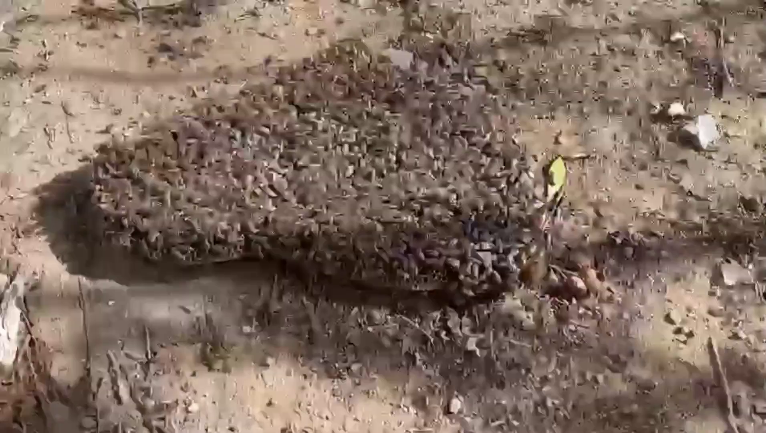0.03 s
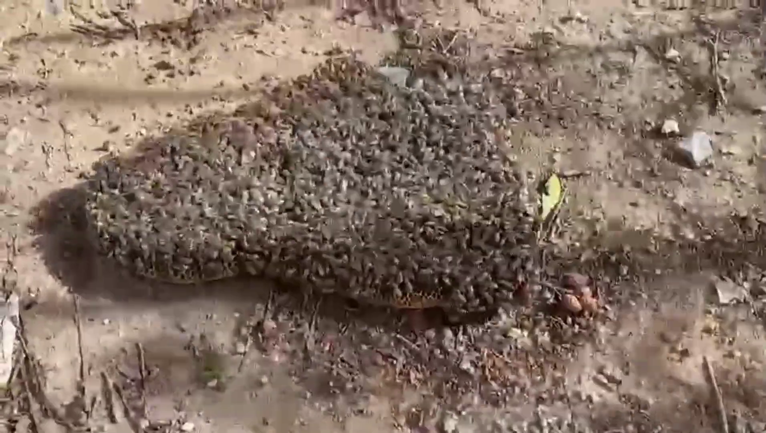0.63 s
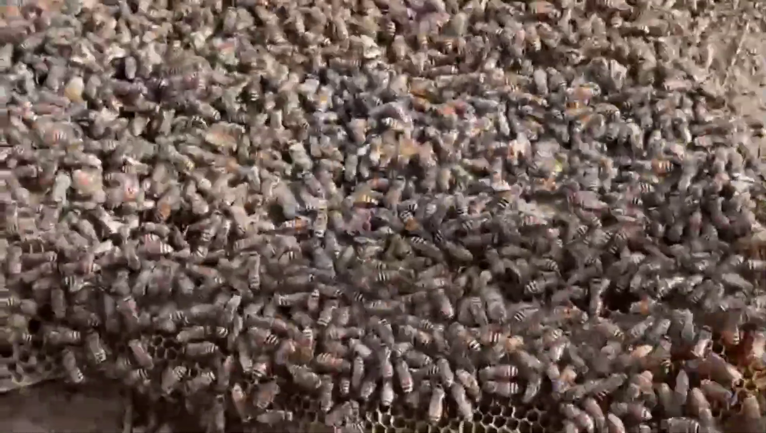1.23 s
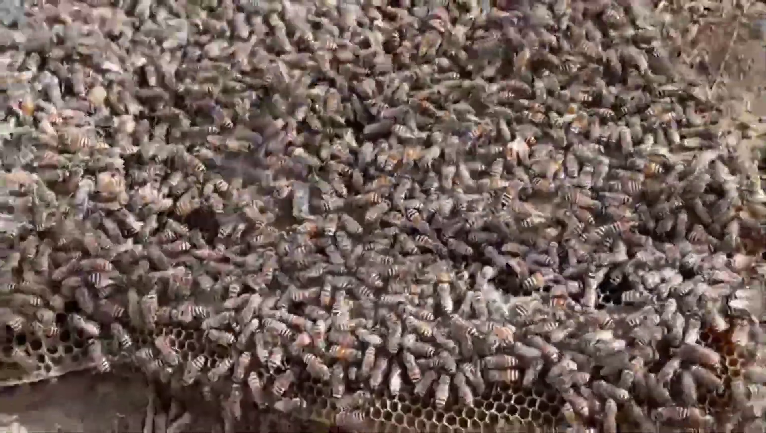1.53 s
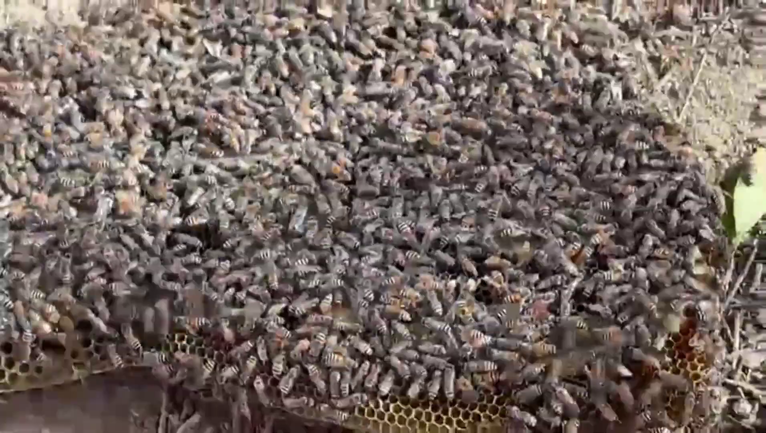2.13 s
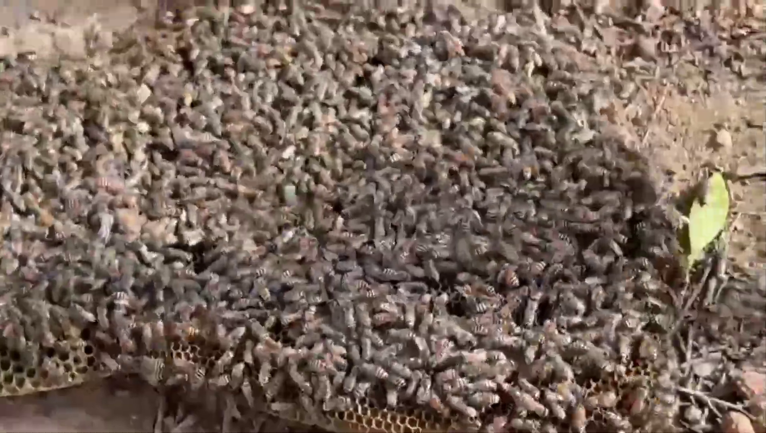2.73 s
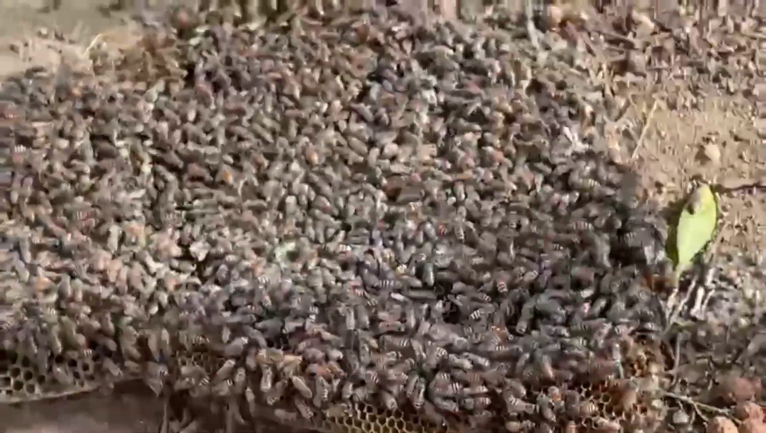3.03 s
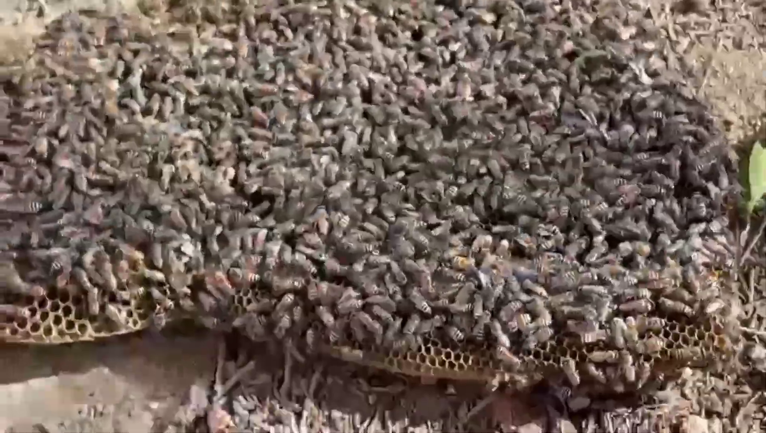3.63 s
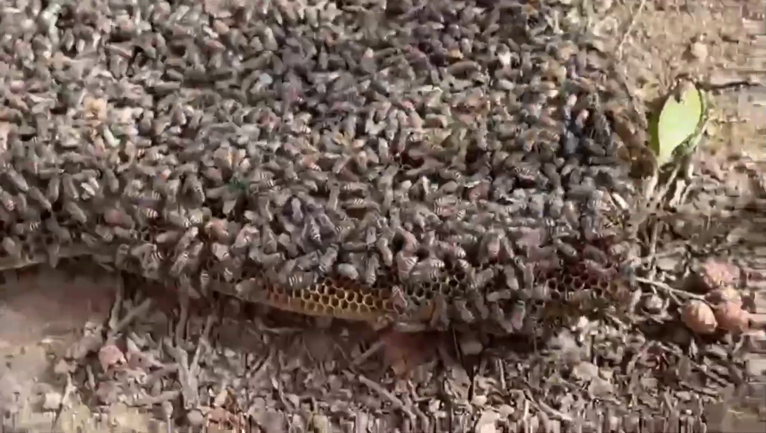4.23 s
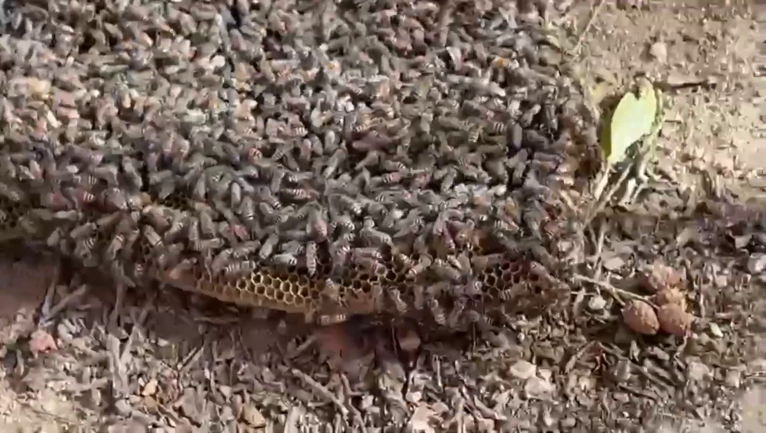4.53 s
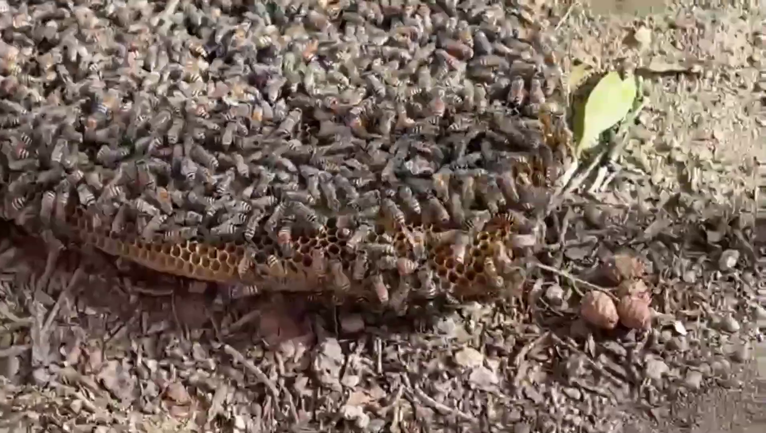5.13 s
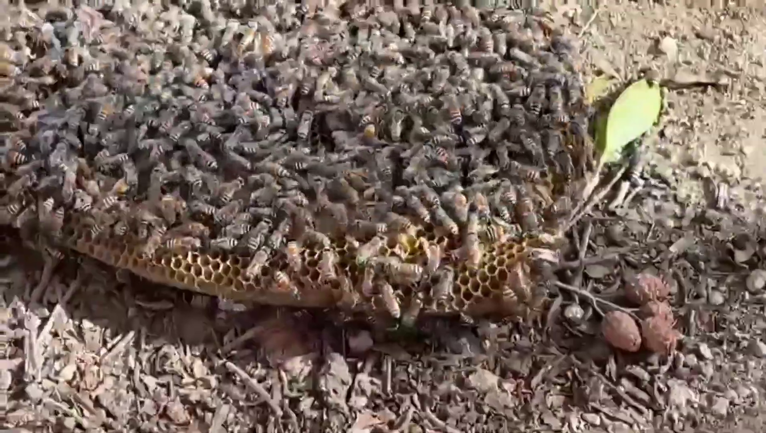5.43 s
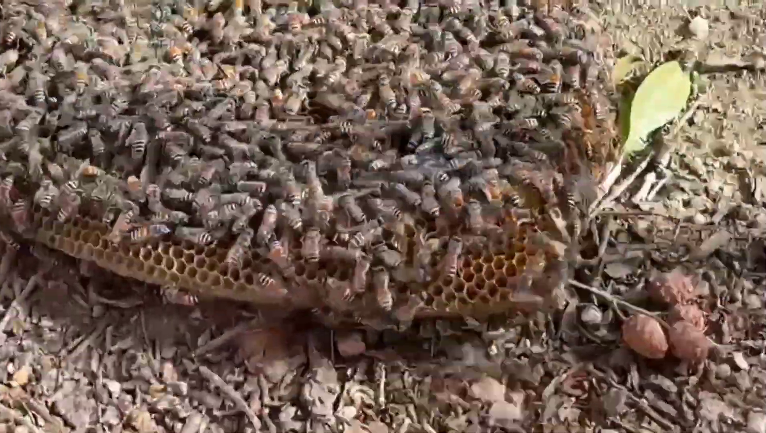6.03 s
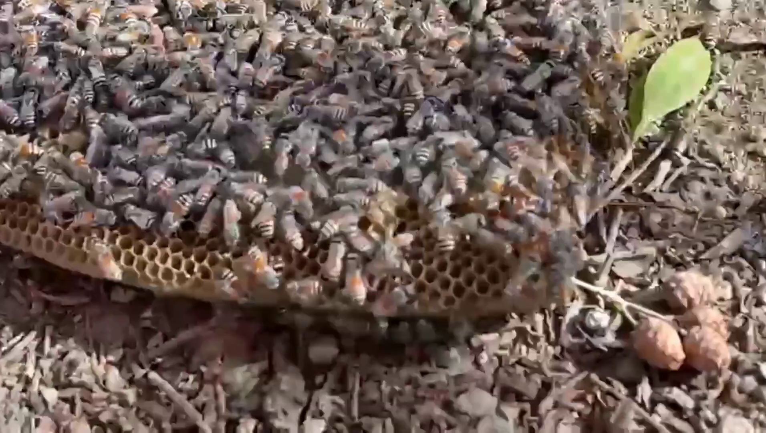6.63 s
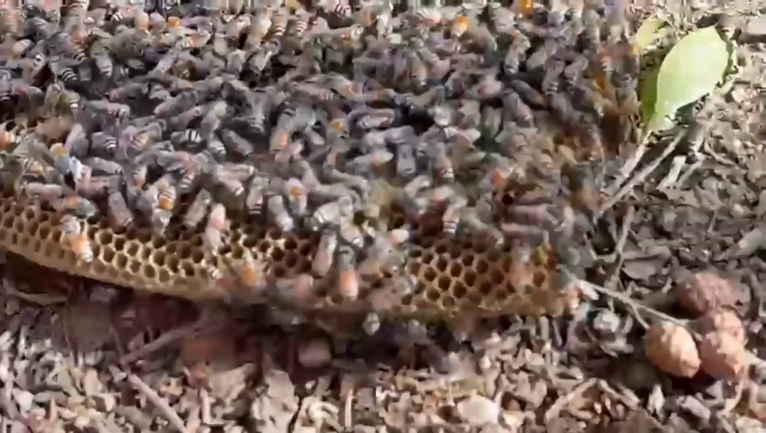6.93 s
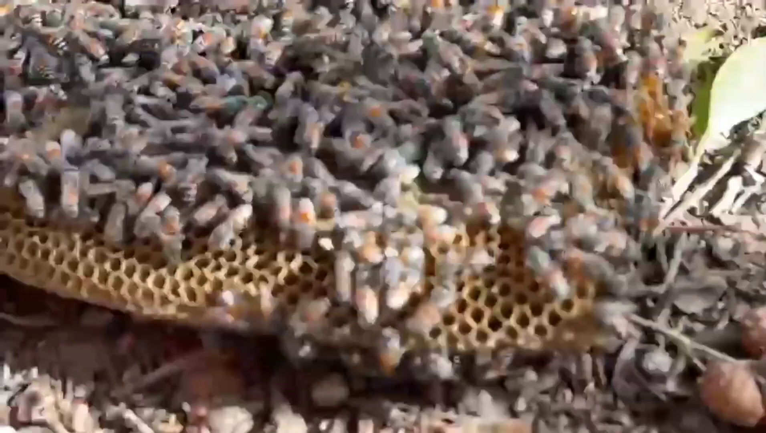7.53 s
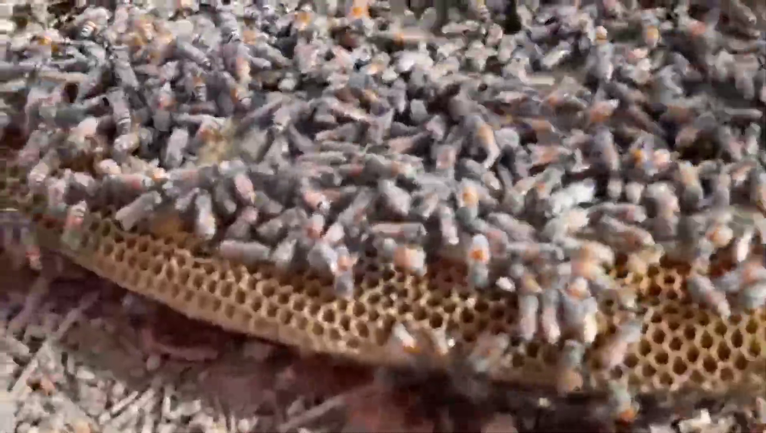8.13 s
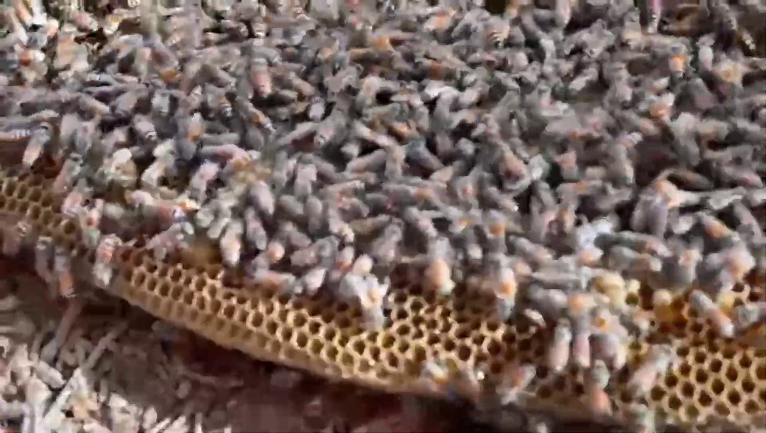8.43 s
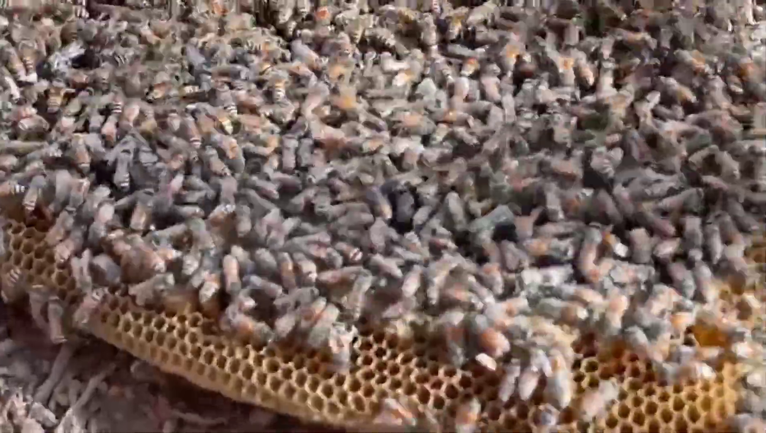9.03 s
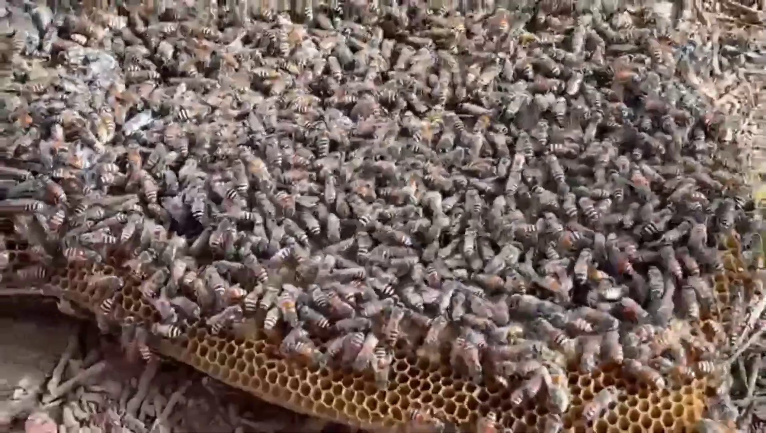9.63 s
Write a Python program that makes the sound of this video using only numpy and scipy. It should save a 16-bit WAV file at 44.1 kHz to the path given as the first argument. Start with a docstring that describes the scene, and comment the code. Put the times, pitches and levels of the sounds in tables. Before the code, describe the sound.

Fine hiss of bees crawling on a honeycomb, joined by a droning swarm and a close buzz that swells and fades.

```python
"""A fine hiss over soft wind: thousands of honeybee legs and wings on a fallen comb outdoors.
As the microphone comes down, interference with the ground's reflection shifts the hiss's colour.
One bee buzzes close by on four visits, each wing beat a pulse that excites a brief resonance.
Behind it a crowd merges into a drone, while others glide past on rising tones or whine thinly."""
import sys
import numpy as np
from scipy import signal
from scipy.fft import rfft, irfft, next_fast_len
from scipy.io import wavfile
from scipy.ndimage import uniform_filter1d, map_coordinates

SR = 44100
rng = np.random.default_rng(int(sys.argv[2]) if len(sys.argv) > 2 else 0)


def materialize(psi):
    """Save the field psi as 16-bit PCM at rate SR to the path in sys.argv[1].

    A 1-D psi becomes a single channel; in a 2-D psi each row is a channel.
    """
    bounded = np.clip(np.atleast_2d(psi).T, -1, 1)
    quanta = np.round(bounded * 32767).astype(np.int16)
    wavfile.write(sys.argv[1], SR, quanta)


N = 436149

# the nearest bee's visits: start_s, hover_from_s, hover_until_s, level_db, flight_loss_db_per_s
VISITS = [(1.595, 1.76, 2.33, -33.7, -2), (3.061, 3.38, 4.4, -28.8, 11), (5.7, 6.63, 6.94, -27.2, 6),
          (8.999, 9.85, 9.89, -29.5, 4)]
ENTRY_S = 0.02  # onset time of the buzz and the drone
# the whining bee's repeated rounds: start_s, level_db
ROUNDS = [(4.3, -42), (6.48, -43), (8.68, -44)]


def amp(db):
    """Amplitude ratio: tenfold for every 20 decibels."""
    return 10 ** (np.asarray(db) / 20)


def unit(x):
    """Normalisation to rms 1."""
    return x / np.sqrt(np.mean(x ** 2) + 1e-20)


def curves(rows):
    """Linear interpolation: one value per sample for each column after the time."""
    s, *columns = np.transpose(rows)
    return [np.interp(np.arange(N) / SR, s, column) for column in columns]


def wobble(rate):
    """Smooth random modulation: a spline through rate Gaussian knots a second."""
    knots = rng.standard_normal(int(N * rate / SR) + 4)
    coarse = np.arange(0, N, 32)
    return np.interp(np.arange(N), coarse, map_coordinates(knots, [coarse * rate / SR]))


def colour(x, points):
    """Minimum-phase filtering: x rings through a response of (frequency_hz, gain_db) points; rms 1."""
    size = 8192
    hz, db = np.transpose(points)
    gain_db = np.interp(np.log(np.fft.rfftfreq(size, 1 / SR) + 1), np.log(hz), db)
    cepstrum = irfft(np.log(amp(gain_db)))
    cepstrum[1:size // 2] *= 2  # folding makes the filter causal
    cepstrum[size // 2 + 1:] = 0
    response = irfft(np.exp(rfft(cepstrum)))
    return unit(signal.fftconvolve(x, response)[:N])


def rush(spectrum, patchy_db, speckle_db):
    """Modulated noise of rms 1: its gain varies in slow, wide patches and short, narrow speckles."""
    z = signal.stft(rng.standard_normal(N), nperseg=512)[2]
    slow, fast = rng.standard_normal((2, *z.shape))
    patches = uniform_filter1d(uniform_filter1d(slow, size=8, axis=0), size=12, axis=1)
    speckles = uniform_filter1d(uniform_filter1d(fast, size=2, axis=0), size=7, axis=1)
    gain_db = patchy_db * unit(patches) + speckle_db * unit(speckles)
    return colour(signal.istft(z * amp(gain_db), nperseg=512)[1][:N], spectrum)


def beats(beat_hz, scatter_db, jitter_s):
    """A quasi-periodic pulse train: one pulse per wing beat, a little uneven in size and time."""
    turns = np.cumsum(beat_hz) / SR + rng.random()
    at = np.interp(np.arange(1, int(turns[-1])), turns, np.arange(N))
    chance = rng.standard_normal((len(at), 2))
    at = at + jitter_s * SR * chance[:, 0]
    taps = np.floor(at)[:, None] + np.arange(-7, 9)
    offset = taps - at[:, None]
    pulses = np.sinc(offset) * np.sinc(offset / 8) * amp(scatter_db * chance[:, 1:])
    return np.bincount(np.clip(taps, 0, N - 1).astype(int).ravel(), pulses.ravel(), N)


def partials(beat_hz, levels, flutter_db, order):
    """A harmonic series of rms 1, from this order upward, each partial fluttering in level."""
    phase = 2 * np.pi * np.cumsum(beat_hz) / SR
    return unit(sum(amp(db + flutter_db * wobble(18)) * np.sin((order + k) * phase)
                    for k, db in enumerate(levels)))


def air():
    """Broadband noise of soft wind and the far swarm, with a faint rumble near the ground."""
    # levels of wind and rumble: time_s, level_db
    wind_level = [(0, -41.5), (1.55, -41.5), (1.7, -45.5), (2.38, -44.5), (2.48, -51), (3.5, -49),
                  (5.5, -49), (8.3, -50), (9.89, -45.5)]
    rumble_level = [(1.55, -102), (1.65, -81.5)]
    # their spectra: frequency_hz, gain_db
    wind_spectrum = [(25, -42), (120, -43), (180, -24.5), (240, -7), (330, -3), (440, -3.5), (550, 1),
                     (720, -1.5), (1050, 4), (1550, 3), (2000, -1.5), (2500, -17), (4000, -50)]
    rumble_spectrum = [(25, -11), (55, -7), (70, -4), (87, 6.5), (110, 1), (150, -3), (260, -21)]
    wind_db, = curves(wind_level)
    rumble_db, = curves(rumble_level)
    wind = amp(wind_db + 0.23 * wobble(4.9)) * rush(wind_spectrum, patchy_db=0.5, speckle_db=1)
    return wind + amp(rumble_db) * rush(rumble_spectrum, patchy_db=0, speckle_db=0.5)


def hiss(stage):
    """Countless legs and wings add up to noise; equal-power crossfades shift its colour with height."""
    # spectra from high above the comb down to closest: frequency_hz, gain_db
    high = [(1500, -33), (2400, -5.5), (3000, -3.5), (4300, -2), (5150, -13), (5800, -5.5), (6400, 2.5),
            (7200, -5.5), (8000, -6.5), (8900, -14), (10000, -42)]
    halfway = [(1500, -27), (2700, 3), (3250, -6), (3700, -1), (4300, 3), (5000, -6.5), (6200, 1),
               (7200, 0), (8700, -5), (9300, -3.5), (10000, -28)]
    close = [(1500, -26), (2800, 3.5), (3300, -4.5), (4400, -3), (5000, -2.5), (5450, 5), (6200, 0.5),
             (7000, -3.5), (7900, -1), (8500, -9.5), (9100, -8), (10000, -31)]
    closest = [(1500, -27.5), (2600, 0), (3200, -3), (4400, -0.5), (5300, -1.5), (6200, 3.5), (7000, -1.5),
               (7900, -4), (8500, -15), (9100, -11), (10000, -31)]
    noises = [rush(high, patchy_db=0.5, speckle_db=-0.5)]
    noises += [rush(near, patchy_db=0.5, speckle_db=3) for near in (halfway, close, closest)]
    return sum(np.cos(np.pi / 2 * np.clip(stage - step, -1, 1)) * noise
               for step, noise in enumerate(noises))


def wing_rasp():
    """Band-limited wing noise, swelling twice on each round of the whining bee."""
    # the rasp's band: frequency_hz, gain_db
    spectrum = [(2900, -47.5), (3300, -11.5), (3550, 2), (3750, 1), (4000, 0.5), (4350, -2), (4650, -8),
                (5100, -45)]
    # its swells within a round: offset_s, width_s, rise_db
    swells = [(.27, 0.34, 1.5), (1.25, 0.49, 2)]
    t = np.arange(N) / SR
    rise_db = sum(db * np.exp(-((t - start - s) / width) ** 2)
                  for start, _ in ROUNDS for s, width, db in swells)
    return amp(rise_db) * rush(spectrum, patchy_db=-0.6, speckle_db=0)


def leg_ticks(per_s=500, scatter_db=4.5):
    """Shot noise: legs catch on the wax at random instants and make a fine crackle."""
    # ring of one tick: frequency_hz, gain_db
    spectrum = [(4500, -28), (5600, -8), (7800, -1), (8600, -15), (10000, 1), (12000, -16)]
    sizes = amp(scatter_db * rng.standard_normal(N)) * rng.choice([-1, 1], N)
    return colour(sizes * (rng.random(N) < per_s / SR), spectrum)


def ground_reflection(x):
    """Interference with the ground's reflection: a notch and a ridge slide as the microphone moves."""
    # cancellation: time_s, centre_hz, depth_db
    notch_path = [(1.55, 6550, 7), (1.68, 6150, 10), (2.0, 5860, 16), (2.2, 5620, 13), (3.02, 5450, 9),
                  (3.15, 6010, 11), (3.3, 6500, 13), (3.7, 6440, 5), (4.3, 7200, 1), (4.6, 7360, 3.5),
                  (8.5, 7350, 7)]
    # reinforcement above it: time_s, centre_hz, height_db
    ridge_path = [(1.3, 8650, -4), (1.45, 8500, 9), (1.58, 8000, 6), (1.72, 7200, 7), (2.2, 7300, 3.5),
                  (3.0, 7260, 5), (3.3, 7540, 3.5), (3.65, 7640, 1), (4.5, 7863, 2), (8.5, 7900, -1.5)]
    hz, t, z = signal.stft(x, SR, nperseg=512)

    def follow(rows):
        s, *columns = np.transpose(rows)
        return [np.interp(t, s, column) for column in columns]

    def bell(centre_hz, width_hz):
        return np.exp(-((hz[:, None] - centre_hz) / width_hz) ** 2)

    notch_hz, depth_db = follow(notch_path)
    ridge_hz, height_db = follow(ridge_path)
    ridge = bell(ridge_hz, width_hz=470)
    trough = 1.1 * bell(ridge_hz + 680, width_hz=270)
    gain_db = height_db * (ridge - trough) - depth_db * bell(notch_hz, width_hz=340)
    return signal.istft(z * amp(gain_db), SR, nperseg=512)[1][:N]


def rustle():
    """Incoherent sum of hiss, rasp, fizz and ticks; the balance shifts as the microphone comes down."""
    # the microphone's path: time_s, stage (0 high to 3 closest)
    descent = [(1.3, 0.12), (1.7, 0.61), (3.05, 1.1), (3.3, 1.46), (3.9, 2.2), (5.42, 1.97), (5.55, 2.3),
               (8.25, 2.53), (8.55, 2.94)]
    # balance at each stage: hiss_db, rasp_db
    stage_levels = [(-42, -57.5), (-46, -54), (-47, -45), (-48.5, -47)]
    # level of the treble: time_s, level_db
    treble_level = [(0.04, -54.5), (1.34, -52.5), (1.54, -47), (1.68, -52), (2.25, -51), (2.6, -47.5),
                    (2.95, -47), (3.2, -48), (4.24, -51.5), (4.59, -45.5), (5.38, -48), (5.54, -51.5),
                    (6.1, -55.5), (6.85, -54.5), (6.99, -50.5), (8.1, -52), (8.5, -56.5), (8.94, -59),
                    (9.54, -57), (9.84, -58.5)]
    # the topmost band: frequency_hz, gain_db
    fizz_spectrum = [(8300, -44), (9100, -12.5), (9600, -1.5), (9950, 2), (10500, -2), (11200, -9.5),
                     (11900, -17.5), (12500, -27)]
    stage, = curves(descent)
    hiss_db, rasp_db = (np.interp(stage, range(4), levels) for levels in np.transpose(stage_levels))
    treble_db, = curves(treble_level)
    swing_db = treble_db - treble_db.mean()  # hiss and rasp each take a share of this
    body = amp(hiss_db + 0.38 * swing_db) * hiss(stage)
    rasp = amp(rasp_db + 0.085 * swing_db) * wing_rasp()
    fizz = amp(-0.15 + 0.37 * wobble(21)) * rush(fizz_spectrum, patchy_db=0.5, speckle_db=4)
    treble = amp(treble_db) * (fizz + amp(-8.5) * leg_ticks())
    return ground_reflection(body + rasp + treble)


def crowd(count=10):
    """Superposition: bees at wandering pitches and distances blur into a drone from the first visit on."""
    # the drone's colour: frequency_hz, gain_db
    spectrum = [(200, -65), (600, -21), (900, -19), (1200, -10.5), (1550, -1), (1850, -2), (2200, -9.5),
                (2700, -16.5), (3300, -19.5), (5000, -54.5)]
    # its level: time_s, level_db
    level = [(1.6, -53), (2.2, -41.5), (2.6, -42), (3.04, -43.5), (3.2, -34), (3.6, -36), (4.1, -36),
             (4.9, -40.5), (5.55, -41.5), (6.5, -39), (7.6, -40), (8.3, -44.5), (9.1, -38.5), (9.89, -39.5)]
    pulses = np.zeros(N)
    for _ in range(count):
        beat_hz = rng.uniform(125, 240) * (1 + 0.02 * wobble(3))
        pulses += beats(beat_hz, scatter_db=1.7, jitter_s=2e-5) * amp(2.1 * wobble(2.015))
    drone = unit(colour(pulses, spectrum) + 0.5 * rush(spectrum, patchy_db=1.5, speckle_db=3.5))
    level_db, = curves(level)
    onset = np.clip((np.arange(N) / SR - VISITS[0][0]) / ENTRY_S, 0, 1)
    return onset * amp(level_db) * drone


def gliders():
    """Harmonics rise with the wing beat: single bees speed up as they swell and fade."""
    # passing bees: level_db, ring_hz, path of (time_s, beat_hz)
    glides = [(-43.5, 1850, [(2.03, 151.5), (2.4, 186)]), (-38, 2100, [(3.1, 162.8), (3.42, 191.5),
              (3.8, 210)]), (-44, 2400, [(3.15, 150), (3.45, 167.7), (3.85, 196.4)]),
              (-36.5, 1560, [(4.56, 122.6), (4.68, 133.5), (4.78, 141.9), (4.97, 144.8), (5.11, 156.4)]),
              (-46.5, 1830, [(5.0, 152.2), (5.2, 168), (5.5, 171.5)]), (-51.5, 2030, [(7.6, 157.3),
              (8.0, 183)]), (-43, 1490, [(8.58, 136.6), (8.85, 141.5), (8.98, 146), (9.09, 153.1),
              (9.36, 163)])]
    # harmonics, upward from two below the one nearest the ring: level_db
    harmonics = [-2.5, -19, 1, -6, -8.5, -15, -11.5]
    t, out = np.arange(N) / SR, np.zeros(N)
    for db, ring_hz, path in glides:
        times, path_hz = np.transpose(path)
        waver = 1 + 0.004 * wobble(22) + 0.011 * wobble(150)
        beat_hz = np.interp(t, times, path_hz) * waver
        tone = partials(beat_hz, harmonics, flutter_db=1.5, order=round(ring_hz / path_hz.mean()) - 2)
        progress = np.clip((t - times[0]) / (times[-1] - times[0]), 0, 1)
        swell = np.sqrt(np.abs(np.sin(np.pi * progress)))
        out += amp(db) * swell * tone
    return out


def whine(path, harmonics, order):
    """Frequency modulation: a wing tone repeats its path on every round, wavering anew each time."""
    t = np.arange(N) / SR
    beat_hz, level_db = curves([(start + s, hz, db + level)
                                for start, db in ROUNDS for s, hz, level in path])
    sounding = sum((t > start + path[0][0]) * (t < start + path[-1][0]) for start, _ in ROUNDS)
    waver = 1 + 0.003 * wobble(20) + 0.006 * wobble(130)
    return sounding * amp(level_db) * partials(beat_hz * waver, harmonics, flutter_db=2, order=order)


def whines():
    """Missing fundamentals: two thin notes carry only upper harmonics; one sags, one darts upward."""
    # each note within a round: offset_s, beat_hz, relative_db
    sag = [(0, 296, -16), (.23, 303, -2), (.31, 310, -4), (.42, 318, -11), (.68, 311, -11),
           (.83, 311.5, -4), (1.02, 311, -3), (1.11, 303.3, -1), (1.18, 301.2, -1), (1.35, 306.7, -1.5),
           (1.47, 301, -5), (1.56, 298, -22)]
    dart = [(1.38, 262, -14), (1.47, 259.5, -6), (1.54, 272, -2.5), (1.6, 280, -5), (1.72, 296, -14)]
    # their harmonics, in rising order: level_db
    sag_harmonics = [-9.5, -22, 4, -13, -14, -15.5]
    dart_harmonics = [1, -16, 0.5, -14]
    return whine(sag, sag_harmonics, order=10) + whine(dart, dart_harmonics, order=13)


def visit_gain(doubling_s=0.35):
    """Spherical spreading: amplitude goes as 1 / distance, with a further dB slope in flight."""
    t, gain = np.arange(N) / SR, np.zeros(N)
    for start, arrive, leave, db, loss_db_per_s in VISITS:
        away_s = np.abs(t - np.clip(t, arrive, leave))
        distance = 1 + away_s / doubling_s  # 1 while hovering
        onset = np.clip((t - start) / ENTRY_S, 0, 1)
        gain = np.maximum(gain, onset * amp(db - loss_db_per_s * away_s) / distance)
    return gain


def wing_scrape(pulses):
    """Amplitude-modulated noise: the wings scrape once a beat, for a moment much harder."""
    # the scrape's colour: frequency_hz, gain_db
    spectrum = [(200, -72), (1500, -30), (2200, -7), (3000, -17), (3600, 0), (4400, -5.5), (5300, -26),
                (9000, -50)]
    # its level against the buzz: time_s, relative_db
    level = [(4.02, -26), (4.06, -15), (4.11, -9), (4.135, -33)]
    level_db, = curves(level)
    stroke = np.abs(uniform_filter1d(pulses, size=40))
    return amp(level_db) * colour(stroke * rng.standard_normal(N), spectrum)


def neighbour(beat_hz, stray=0.025):
    """Beating: a second bee, almost in step with the nearest, wavers beneath its buzz."""
    # its lower ring: frequency_hz, gain_db
    spectrum = [(300, -72), (750, -33), (1020, -0.5), (1180, -2), (1400, -1.5), (1900, -36), (4000, -63)]
    pulses = beats(beat_hz * (1 + stray * wobble(12)), scatter_db=1.5, jitter_s=5e-5)
    return colour(pulses, spectrum)


def near_bee():
    """Source and filter: each wing beat of the nearest bee excites a brief resonance near 1.6 kHz."""
    # wing beat, one curve a visit: time_s, beat_hz
    beat_paths = [
        [(1.6, 126.4), (1.68, 126.4), (1.75, 117), (1.88, 114), (1.96, 122), (2.1, 127.5), (2.23, 129),
         (2.31, 123.7), (2.44, 121.6), (2.6, 123.5), (2.77, 124.5), (2.87, 119.5), (2.99, 118.4)],
        [(3.08, 124.4), (3.18, 123.5), (3.29, 126), (3.37, 132), (3.45, 116), (3.55, 112), (3.63, 119),
         (3.85, 126.4), (3.93, 124.8), (4.09, 126), (4.24, 124.7), (4.38, 121.6), (4.52, 124), (4.64, 123.2),
         (4.75, 125), (4.93, 124), (5.0, 120.3)],
        [(5.75, 118), (5.95, 126.7), (6.1, 123.2), (6.28, 124.8), (6.4, 123.8), (6.52, 124.2), (6.62, 122.8),
         (6.74, 120.6), (6.87, 121.7), (7.0, 122), (7.1, 123.8), (7.27, 129), (7.6, 122), (7.92, 126)],
        [(9.1, 127), (9.22, 124.3), (9.46, 124.6), (9.66, 120.8), (9.78, 123.2), (9.88, 122)],
    ]
    # ring of one beat, and its bright upper edge: frequency_hz, gain_db
    ring_spectrum = [(200, -69), (550, -42), (850, -32.5), (1100, -13.5), (1230, -10.5), (1350, -2.5),
                     (1480, 3), (1620, 3), (1830, .5), (2030, -8.5), (2500, -16), (3000, -18.5),
                     (3400, -25.5), (5200, -51)]
    edge_spectrum = [(1200, -87), (2700, -36), (3200, -16), (3420, 0.5), (3720, 0), (3950, -9.5),
                     (4500, -9.5), (5200, -30), (9000, -51)]
    # the edge carries only from close by: time_s, relative_db
    edge_level = [(3.3, -27), (3.9, -15), (4.5, -14.5), (6.8, -16.5), (9.8, -12.5)]
    beat_hz, = curves(np.concatenate(beat_paths))
    pulses = beats(beat_hz * (1 + 0.0012 * wobble(25)), scatter_db=0.5, jitter_s=9e-6)
    # an all-pass delays the sound around the ring, so the highest part arrives first
    dispersed = 2 * signal.lfilter(*signal.iirpeak(1450, 1.3, SR), pulses) - pulses
    ring = colour(dispersed, ring_spectrum)
    edge_db, = curves(edge_level)
    edge = amp(edge_db) * colour(pulses, edge_spectrum)
    return visit_gain() * (ring + edge + wing_scrape(pulses) + amp(-20) * neighbour(beat_hz))


def scene():
    """Superposition of all the bees and the open air, in one channel."""
    return (near_bee() + crowd() + gliders() + whines() + rustle() + air())[None]


def record(dry):
    """Band limiting: an ideal low-pass filter keeps nothing above 12.5 kHz."""
    size = next_fast_len(N + SR // 2)
    passband = np.fft.rfftfreq(size, 1 / SR) < 12500
    return irfft(rfft(dry, size) * passband, size)[:, :N]


dry = scene()
out = record(dry)
materialize(out)
```